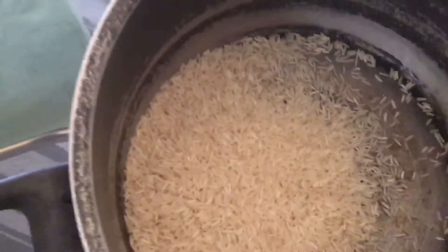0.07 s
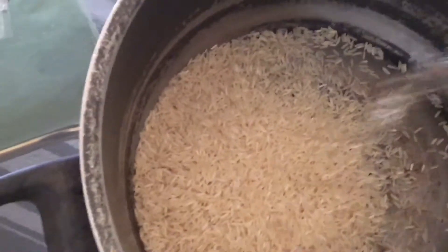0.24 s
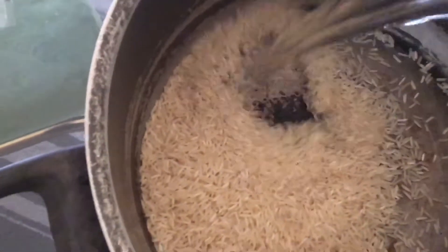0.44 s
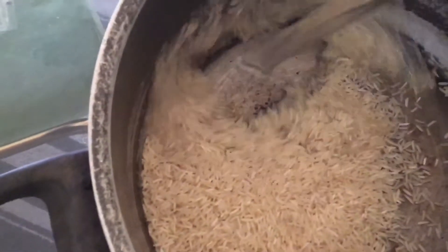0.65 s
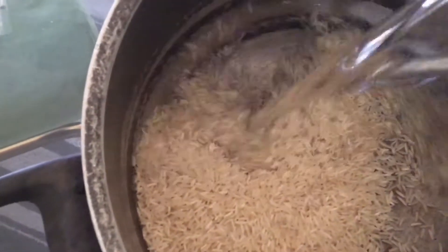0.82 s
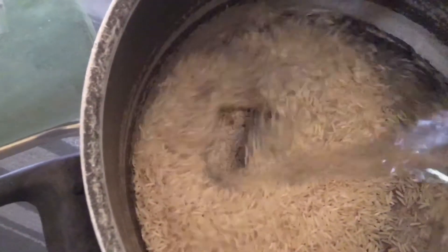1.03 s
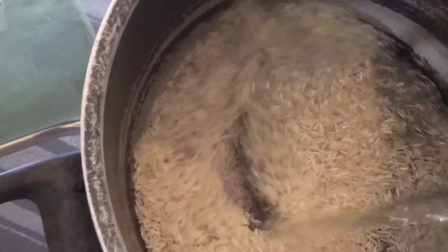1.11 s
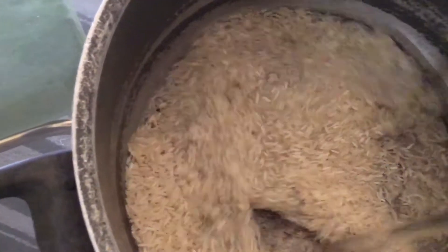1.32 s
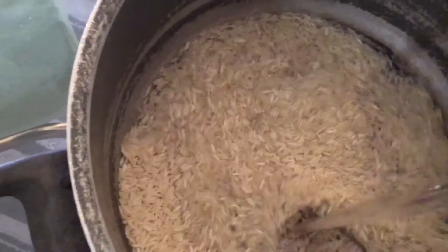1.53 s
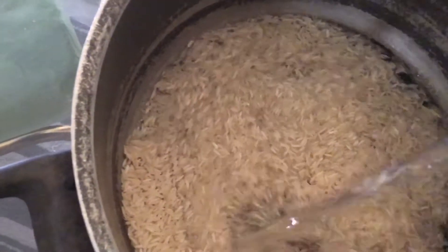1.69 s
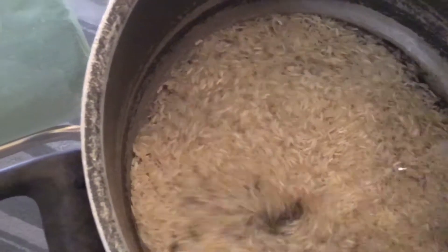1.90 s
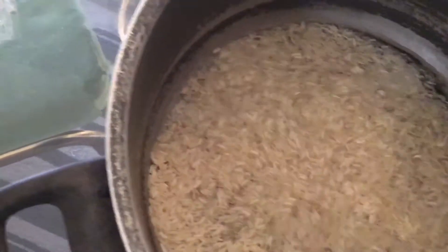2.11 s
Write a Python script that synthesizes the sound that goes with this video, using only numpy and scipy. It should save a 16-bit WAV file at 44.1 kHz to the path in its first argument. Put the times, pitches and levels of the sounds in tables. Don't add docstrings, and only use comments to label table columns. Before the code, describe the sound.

After a brief quiet kitchen hum, a stream of water splashes into rice, bubbling and making the metal pot ring; it glugs, thins and cuts off to last tiny drips, heard close in mono.

```python
import sys
import numpy as np
from scipy import signal
from scipy.io import wavfile
from scipy.ndimage import uniform_filter1d

SR = 44100
rng = np.random.default_rng(int(sys.argv[2]) if len(sys.argv) > 2 else 0)


def waveform_to_disk(signal):
    frames = np.transpose(np.atleast_2d(signal))
    scaled = np.clip(frames, -1, 1) * 32767
    samples = np.round(scaled).astype(np.int16)
    wavfile.write(sys.argv[1], SR, samples)


def convert_level_to_amplitude(level_db):
    exponent = np.asarray(level_db, float) / 20
    return 10 ** exponent


N = 94815

# time_s, level_db, spray_tilt_db_per_octave, commonest_bubble_pitch_hz
FLOW = [(0.221, -41.5, 0.5, 5700), (0.281, -39, 1.5, 4600), (.335, -33.5, 0, 5540), (.42, -37, 1, 4920),
        (.53, -37, 0, 3730), (.62, -37.5, -0.8, 3430), (.67, -39.5, -1, 4200), (.75, -39, -0.9, 4730),
        (.86, -40, -1.5, 4200), (.95, -35.5, 0, 5200), (1.129, -38, 0.5, 4770), (1.23, -41, -1, 4800),
        (1.44, -42.5, -1.9, 3750), (1.68, -45.5, -1.5, 3250), (1.78, -44, -3, 4830), (1.839, -47, -1, 4100),
        (1.921, -63, -1.5, 4480), (2.01, -79, -2, 3400)]
# time_s, pitch_hz
CAVITY = [(0.223, 4700), (0.259, 2000), (0.315, 1380), (0.333, 564), (.8, 666), (.9, 1020), (1.375, 1080),
          (1.392, 300), (1.46, 353), (1.48, 950), (1.55, 684), (1.68, 513), (1.72, 520), (1.74, 905),
          (1.79, 900), (1.8, 647), (1.83, 715), (1.88, 1470)]
# frequency_hz, level_db (per Hz)
SPLASH_COLOUR = [(300, -24.5), (600, -13.5), (1200, -8.5), (1800, -3.5), (3700, -0.5), (9000, -3),
                 (15000, -11)]
# start_s, level_db (peak), pitch_hz
BUBBLES = [(0.3202, -33, 1770), (0.537, -29, 2540), (0.5661, -33, 1310), (0.6796, -30, 1500),
           (0.685, -28, 1910), (0.9295, -37, 1037), (1.0888, -29, 2370), (1.1026, -37.5, 1124),
           (1.1848, -39.5, 1070), (1.2424, -36, 1090), (1.255, -28.5, 1980), (1.3115, -30.5, 2470),
           (1.39, -29.5, 1860), (1.3962, -32, 1830), (1.4713, -36, 2430), (1.5366, -31, 2370),
           (1.6679, -38.5, 1610), (1.672, -32.5, 2250), (1.721, -38, 1760), (1.7938, -27.5, 1858),
           (1.872, -35, 2340), (0.956, -33, 1790), (0.994, -41.5, 1810), (1.07, -48, 1080),
           (1.118, -48, 1090), (1.156, -45.5, 1040), (1.2, -43.5, 1090), (1.219, -42, 1130),
           (1.393, -42, 1100), (1.413, -40.5, 1050), (1.4354, -39, 2300), (1.454, -40, 1500),
           (1.473, -44, 1690), (1.492, -39.5, 1630), (1.689, -37, 1800), (1.7317, -34, 2290),
           (1.742, -33, 2320), (1.781, -30, 2350), (1.81, -35, 2450), (1.999, -62, 2450), (1.756, -47, 980),
           (1.78, -42.5, 1000), (1.786, -38, 1250), (0.27, -46, 1510), (0.295, -45, 1540),
           (0.46, -36.5, 1480), (1.915, -55, 2000), (1.944, -57, 2400)]
# start_s, level_db (peak), pitch_hz
DROPS = [(0.2534, -27, 5100), (0.2654, -28, 4700), (0.2754, -28, 4580), (0.3154, -23.5, 4350),
         (0.3374, -27, 5770), (0.5013, -26, 3950), (0.5304, -27, 5560), (0.5437, -23.5, 3780),
         (0.5914, -40, 3100), (0.7234, -27.5, 4780), (0.7372, -24, 4780), (0.7746, -24.5, 4420),
         (1.3957, -27.5, 3480), (1.6018, -31.5, 3210), (1.6621, -36, 3050), (1.7799, -21.5, 4650),
         (1.8173, -28, 3860), (1.8374, -38, 5200), (1.8642, -37.5, 3740), (1.8714, -34, 5400),
         (1.8911, -37, 5300), (2.0903, -54.5, 4870), (2.14, -57, 5630), (0.4161, -32, 5550),
         (0.5445, -24, 5060), (0.5717, -35, 4200), (0.582, -27, 4500), (0.598, -33, 2870),
         (0.611, -30, 3580), (0.634, -29.5, 3860), (0.6974, -32, 4130), (0.8511, -33.5, 3670),
         (0.948, -34.5, 3750), (0.955, -30, 5430), (0.985, -37, 3630), (1.0187, -31.5, 3750),
         (1.108, -30, 4830), (1.682, -36.5, 3610), (1.7317, -45, 4570), (1.746, -40, 3950),
         (1.782, -24.5, 5370), (1.853, -37, 4730), (1.866, -39, 4640), (1.933, -54, 3100),
         (1.956, -55, 4900), (1.9826, -57.5, 3360), (1.96, -58, 3150), (1.91, -44, 4400),
         (2.018, -60, 4900)]
# start_s, level_db (peak), pitch_hz
GURGLES = [(0.315, -58, 890), (0.336, -43, 603), (0.35, -43.5, 700), (0.485, -47, 746), (0.52, -39.5, 1060),
           (0.564, -56, 705), (0.373, -43.5, 850), (0.408, -45.5, 742), (0.453, -42.5, 730),
           (0.586, -44, 570), (0.605, -42.5, 630), (0.662, -46.5, 636), (0.811, -43, 830),
           (0.608, -38, 1160), (0.763, -35, 1300), (0.737, -42, 756), (0.789, -37.5, 717),
           (0.928, -40.5, 794), (1.241, -70, 851), (1.397, -38, 570), (1.405, -44, 700),
           (1.437, -40.5, 656), (1.459, -51, 810), (1.549, -53, 674), (1.599, -44.5, 723), (1.67, -41, 617),
           (1.696, -41, 531), (1.797, -41, 750), (1.814, -40.5, 700), (1.377, -45, 830), (1.535, -48, 710),
           (1.574, -70, 724), (1.65, -48, 755), (1.71, -46, 554), (1.42, -50, 700), (1.68, -44, 585),
           (1.72, -52, 530)]
# start_s, level_db (peak), pitch_hz
GLUGS = [
    (1.397, -35, 262),
    (1.405, -42, 273),
    (1.417, -46, 278),
    (1.446, -47.5, 343),
    (1.459, -55, 264),
]
# start_s, level_db (peak), pitch_hz
TICKS = [(1.0111, -23, 9000), (1.4436, -29, 11200), (1.7316, -29, 8000), (1.766, -36, 7900),
         (1.7745, -26.5, 8750), (1.781, -28, 6340), (1.8155, -34, 7070), (1.8374, -39, 8050),
         (1.8514, -39, 7700), (1.866, -36.5, 5960), (1.8962, -42, 6600), (1.9313, -47, 6800),
         (1.9694, -62, 6400), (2.0277, -59, 9220), (2.0404, -58, 8160), (2.097, -59, 8340),
         (2.1134, -58, 8840)]
# pitch_hz, width_hz, level_db
POT_MODES = [(1062, 79, -0.5), (1541, 39, -1), (1717, 114, -4.5), (2000, 12, 3.5), (2470, 35, -4),
             (3070, 22, 1.5), (3750, 140, -11), (4780, 38, -4.5), (6320, 62, -2), (8870, 200, -7)]
# frequency_hz, level_db (per Hz)
SOAK_COLOUR = [(880, -43), (1500, -6), (3350, -9), (4870, -1.5), (8000, -5.5), (16000, -13)]
# frequency_hz, level_db (per Hz)
RUMBLE_COLOUR = [(26, -43), (45, -17.5), (126, -6.5), (255, -16), (342, -20.5), (748, -35.5), (866, -38.5),
                 (6430, -51.5), (15500, -55.5)]
# pitch_hz, level_db
HUM = [(62, -66), (81, -60.5), (119.6, -55), (210.5, -68)]
HUM_WAVER = [3, 2.5, 0.5, 2.2]
HUM_DRIFT = [0.03, 0.02, 0.003, 0.012]

PIVOT_HZ = 4200


def evened(x):
    return x / np.sqrt(np.mean(x ** 2) + 1e-20)


def read_colour(points, hz):
    f, db = np.transpose(points)
    return np.interp(np.log(hz + 1), np.log(f + 1), db)


def octaves_above(hz, base_hz):
    return np.log2((hz + 1) / base_hz)


def stream():
    start_s, attack_s = 0.2178, 0.002
    t = np.arange(N) / SR
    flow = np.sqrt(np.mean(convert_level_to_amplitude(flow_db(t, PIVOT_HZ)) ** 2))
    hiss = noise(lambda s, hz: read_colour(SPLASH_COLOUR, hz) + flow_db(s, hz), 3, -0.25, size=512)
    fizz = grains(SPLASH_COLOUR, 460, per_s=3000, cycles=6.1, spread_db=2.5, glide=0.09, level_db=flow_db)
    spatter = grains(SPLASH_COLOUR, 2190, per_s=2000, cycles=3.5, spread_db=2.5, glide=0, level_db=flow_db)
    mix = convert_level_to_amplitude(-3) * evened(hiss) + convert_level_to_amplitude(-9) * evened(fizz) + convert_level_to_amplitude(-14) * evened(spatter)
    return flow * mix * np.clip((t - start_s) / attack_s, 0, 1)


def flow_db(t, hz):
    s, db, tilt, swarm_hz = np.transpose(FLOW)
    cavity_s, cavity_hz = np.transpose(CAVITY)
    over = octaves_above(hz, np.exp(np.interp(t, cavity_s, np.log(cavity_hz))))
    below = np.clip(52 * over, -8.5, 0)
    cavity = below + 3 * np.exp(-(over / 0.053) ** 2)
    from_swarm = octaves_above(hz, np.interp(t, s, swarm_hz))
    swarm = (4.5 - 1.5 * t) * np.exp(-(from_swarm / 0.31) ** 2)
    shut = -300 * np.maximum(t - s[-1], 0)
    spray = np.interp(t, s, tilt) * octaves_above(hz, PIVOT_HZ)
    return np.interp(t, s, db) + spray + cavity + swarm + shut


def noise(shape_db, patchy_db, flicker_db, size):
    hop = size // 4
    frames, hz = N // hop + 5, np.fft.rfftfreq(size, 1 / SR)
    real, imaginary, patches = rng.standard_normal((frames, len(hz), 3)).T
    patches = uniform_filter1d(patches, size=5, axis=0)
    patches = evened(uniform_filter1d(patches, size=9, axis=1))
    flicker = evened(uniform_filter1d(rng.standard_normal(frames), size=3))
    db = shape_db(np.arange(frames) * hop / SR, hz[:, None])
    db = db + patchy_db * patches + flicker_db * flicker
    slices = (real + 1j * imaginary) * convert_level_to_amplitude(db)
    return signal.istft(slices, nperseg=size, noverlap=size - hop)[1][:N]


def grains(colour, lo_hz, per_s, cycles, spread_db, glide, level_db):
    t, out = np.arange(N) / SR, np.zeros(N)
    strength = convert_level_to_amplitude(spread_db * np.minimum(rng.exponential(1, N), 4))
    hits = strength * (rng.random(N) < per_s / SR)
    which = rng.integers(0, 40, N)
    for k, hz in enumerate(np.geomspace(lo_hz, 15500, num=40)):
        one = bubble(hz, cycles, glide)
        one = one / np.linalg.norm(one) * convert_level_to_amplitude(read_colour(colour, hz)) * np.sqrt(hz)
        out += signal.oaconvolve(hits * (which == k) * convert_level_to_amplitude(level_db(t, hz)), one)[:N]
    return out


def bubble(hz, cycles, glide):
    u = np.arange(int(3 * cycles / hz * SR) + 8) * hz / SR
    fade = np.minimum(u / 1.7, 1) * convert_level_to_amplitude(-20 * u / cycles)
    return fade * np.sin(2 * np.pi * u * (1 + glide * u / cycles / 2))


def pops(rows, cycles, glide, snap_db, snap_cycles=10, low=0.7):
    out = np.zeros(N + SR)
    for s, db, hz in rows:
        one = bubble(hz, cycles, glide)
        band = signal.butter(2, [low * hz, min(1.7 * hz, 15000)], "band", fs=SR)
        snap = evened(signal.lfilter(*band, rng.standard_normal(8000)))[:len(one)]
        u = np.arange(len(one)) * hz / SR
        snap = snap * np.minimum(u / 3, 1) * convert_level_to_amplitude(snap_db - 20 * u / snap_cycles)
        out[round(s * SR):][:len(one)] += convert_level_to_amplitude(db) * (one + snap)
    return out[:N]


def pot(x):
    out = np.zeros(N)
    for hz, width, db in POT_MODES:
        r = np.exp(-np.pi * width / SR)
        ring = [1, -2 * r * np.cos(2 * np.pi * hz / SR), r * r]
        out += convert_level_to_amplitude(db) * signal.lfilter([1 - r * r, 0, r * r - 1], ring, x)
    return convert_level_to_amplitude(-10.5 + 4.5 * np.arange(N) / SR) * out


def soak():
    from_s = 1.85
    crackle = grains(SOAK_COLOUR, 2100, per_s=5000, cycles=14, spread_db=2.5, glide=0,
                     level_db=lambda t, hz: np.where(t > from_s, 0, -99))
    crackle = crackle * convert_level_to_amplitude(2 * wander(30))
    return convert_level_to_amplitude(-68.5) * crackle / np.std(crackle[round(from_s * SR):])


def room(x):
    taps, at = np.zeros(SR // 2), np.arange(150, SR // 2 - 20, 20)
    taps[at + rng.integers(0, 20, len(at))] = rng.choice([-1., 1.], len(at))
    taps *= convert_level_to_amplitude(-60 * np.arange(SR // 2) / SR / 0.48)
    return convert_level_to_amplitude(-14) * signal.fftconvolve(x, taps / np.linalg.norm(taps))[:N]


def kitchen():
    rumble = noise(lambda s, hz: read_colour(RUMBLE_COLOUR, hz) + 0 * s, 0.92, 1.0, size=2048)
    out = convert_level_to_amplitude(-58.5) * evened(rumble)
    for (hz, db), waver_db, drift in zip(HUM, HUM_WAVER, HUM_DRIFT):
        level = np.sqrt(2) * convert_level_to_amplitude(db + waver_db * wander(12))
        turns = np.cumsum(hz * (1 + drift * wander(6))) / SR
        out = out + level * np.sin(2 * np.pi * turns)
    return out


def wander(top_hz):
    t, out = np.arange(N) / SR, np.zeros(N)
    for f in np.geomspace(0.4, top_hz, num=16):
        out += np.sin(2 * np.pi * (f * t + rng.random())) / np.sqrt(f)
    return evened(out)


def scene():
    water = stream()
    water = water + pops(BUBBLES, cycles=11.3, glide=0.042, snap_db=-12)
    water = water + pops(DROPS, cycles=22.3, glide=0.081, snap_db=-12)
    water = water + pot(water)
    water = water + pops(GURGLES, cycles=6.6, glide=0.084, snap_db=-3, low=0.5)
    water = water + pops(GLUGS, cycles=6.9, glide=0.11, snap_db=-12)
    water = water + pops(TICKS, cycles=22, glide=0, snap_db=-10, snap_cycles=40)
    water = water + soak()
    return np.tile(water + room(water) + kitchen(), (2, 1))


def roll_off(x):
    return signal.sosfilt(signal.butter(12, 16380, fs=SR, output="sos"), x)


def record(dry):
    low_cut = signal.butter(4, 39.5, "high", fs=SR, output="sos")
    top_cut = signal.firwin(1023, 15780, window=("kaiser", 9), fs=SR)
    mix = signal.sosfilt(low_cut, dry)
    mix = signal.oaconvolve(mix, top_cut[None], "same")
    return roll_off(mix)


dry = scene()
out = record(dry)
waveform_to_disk(out)
```